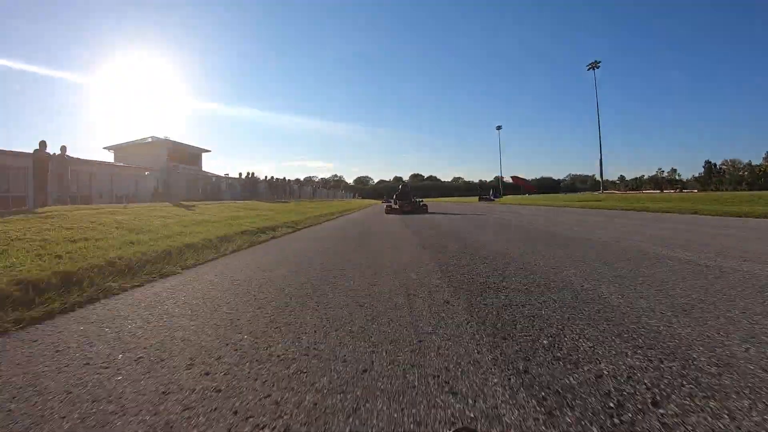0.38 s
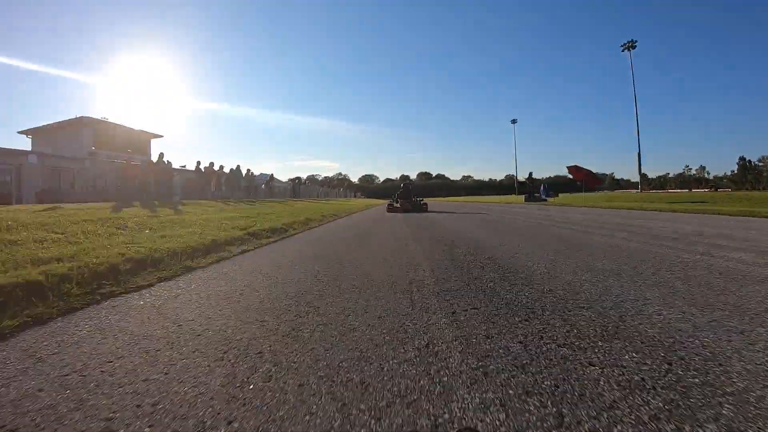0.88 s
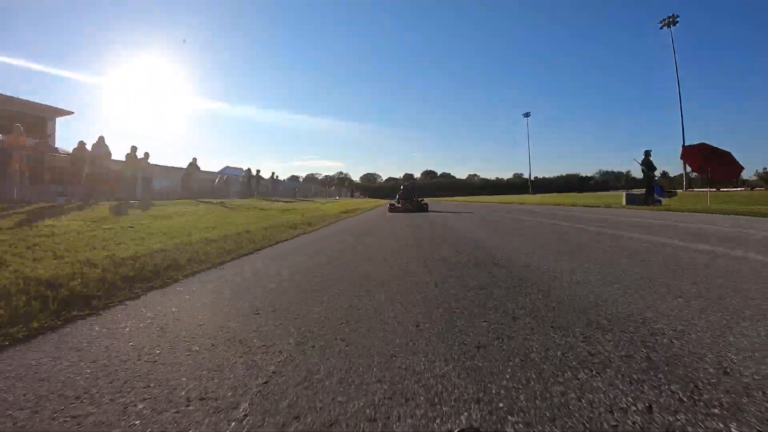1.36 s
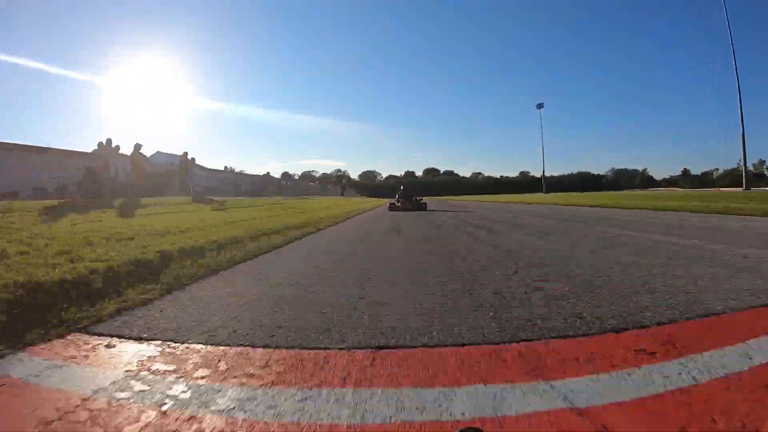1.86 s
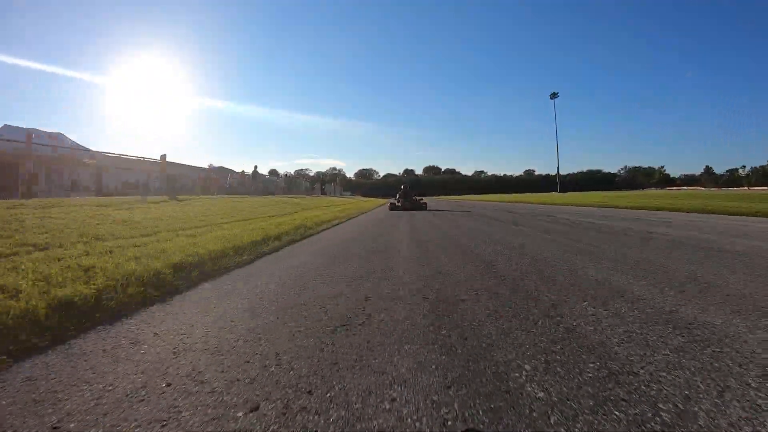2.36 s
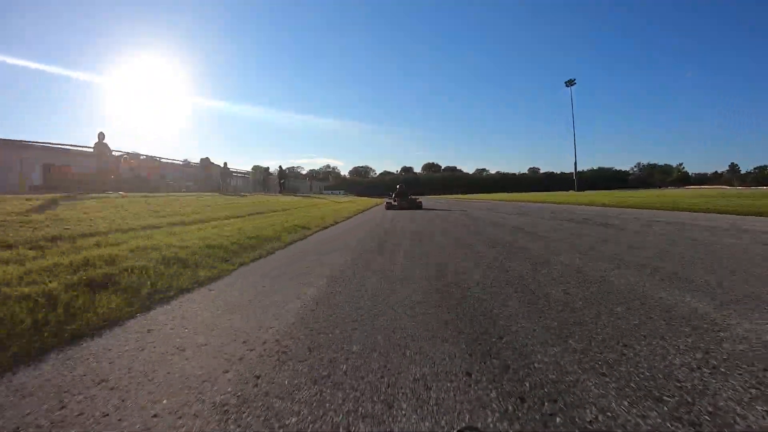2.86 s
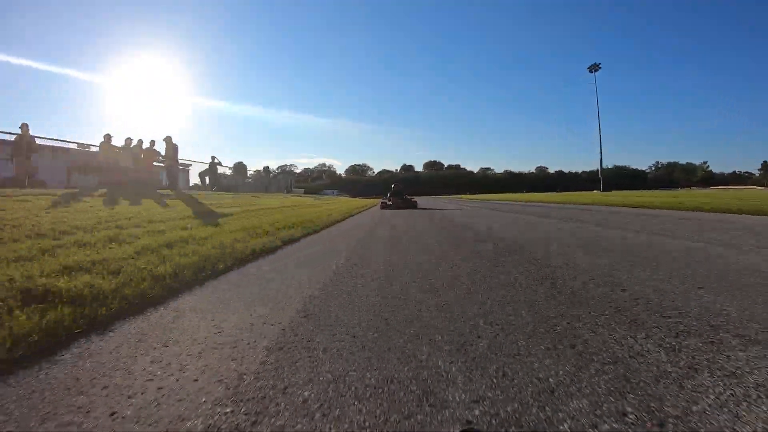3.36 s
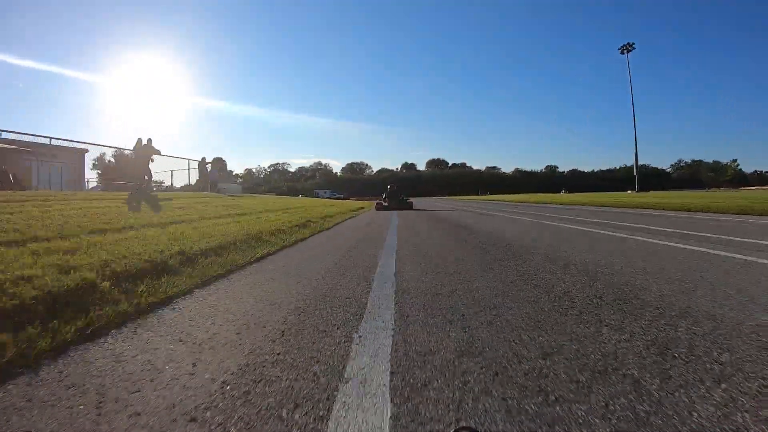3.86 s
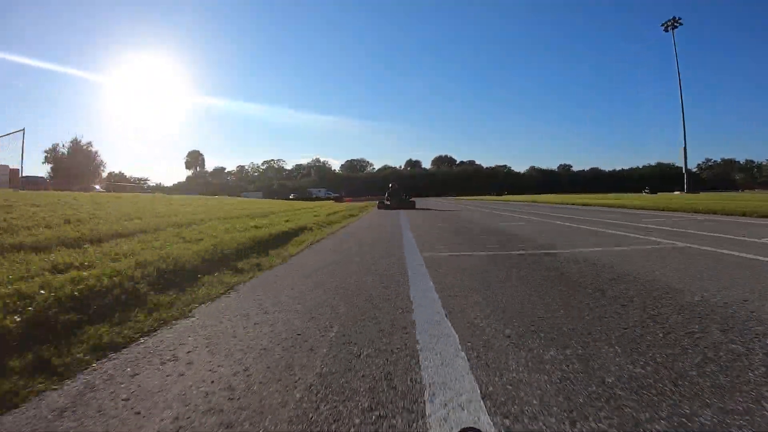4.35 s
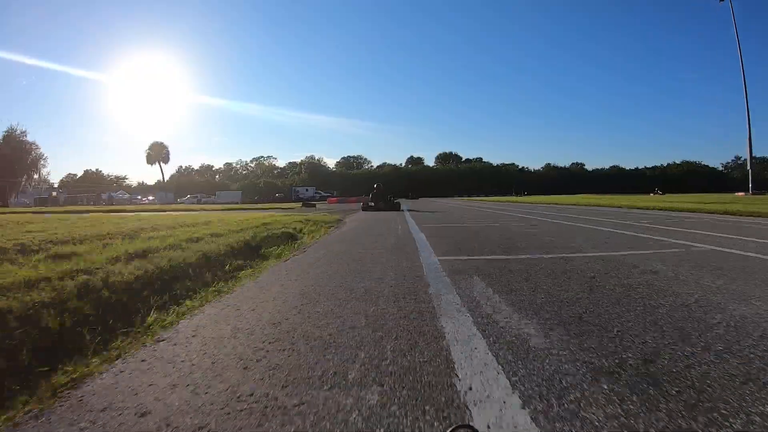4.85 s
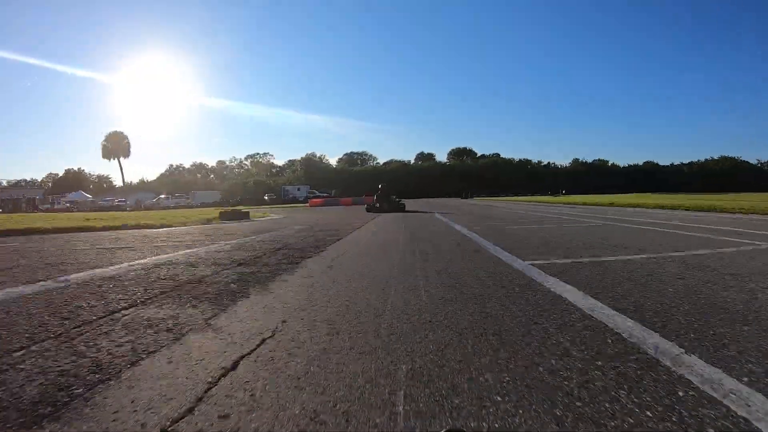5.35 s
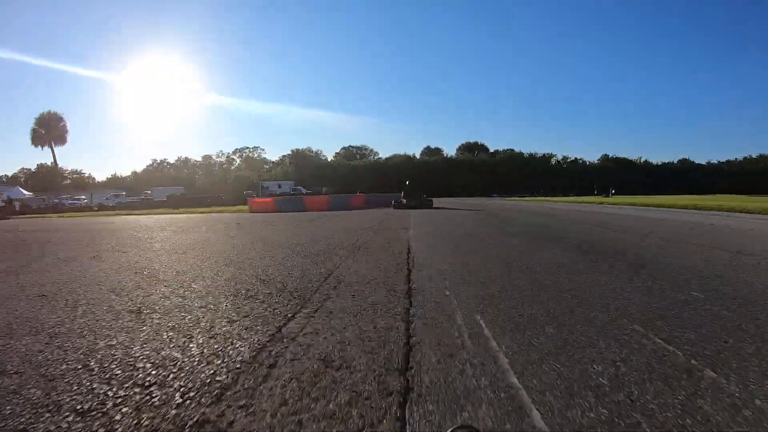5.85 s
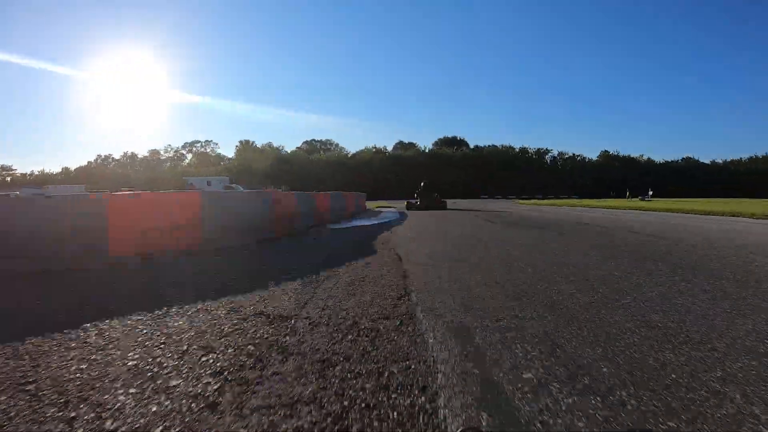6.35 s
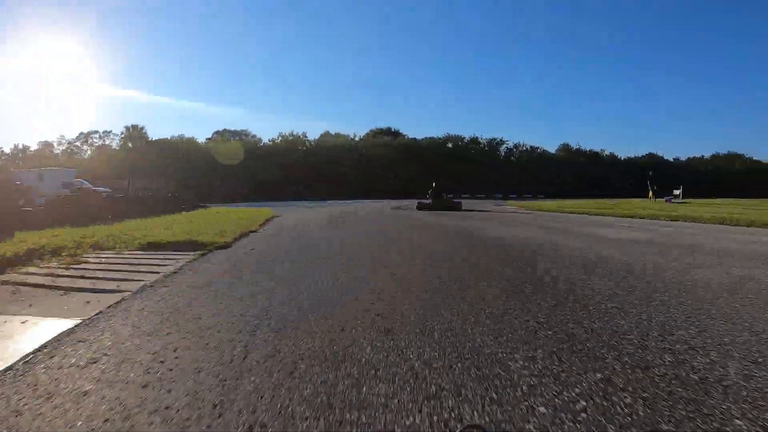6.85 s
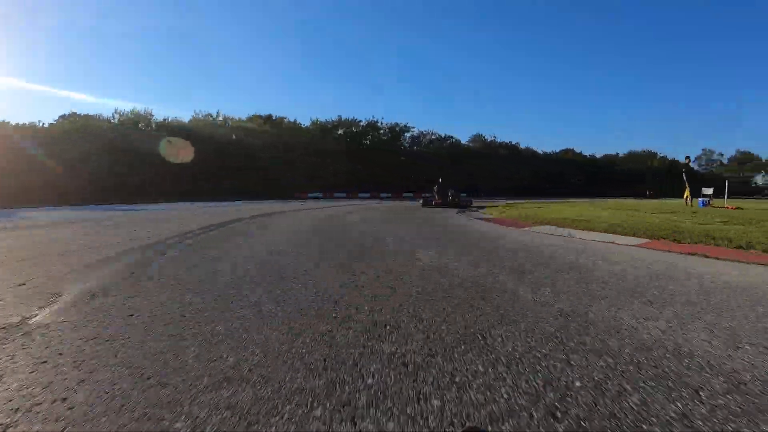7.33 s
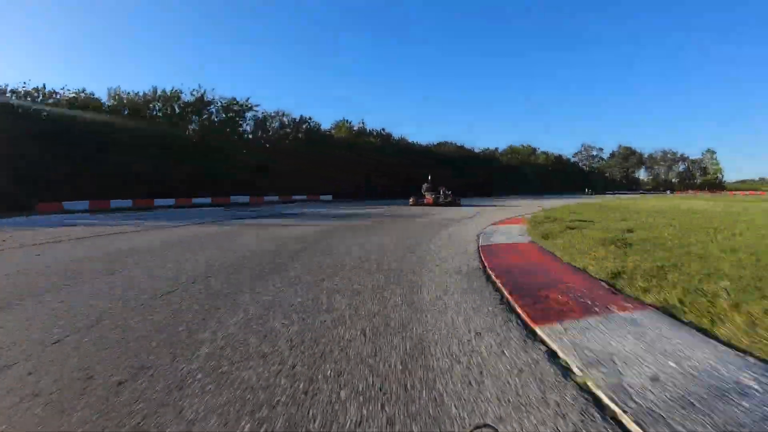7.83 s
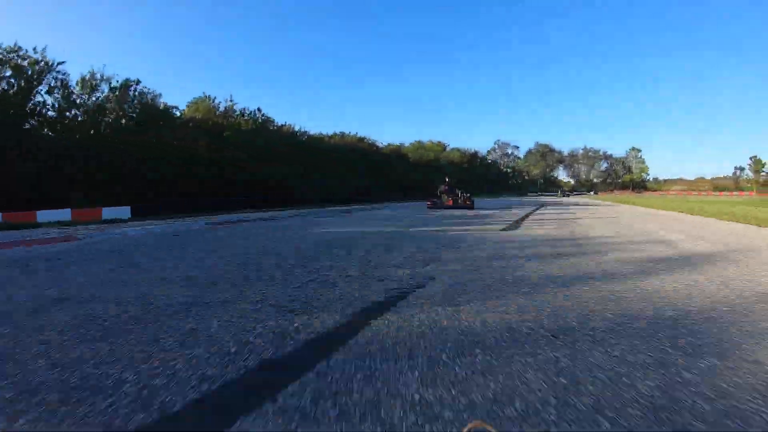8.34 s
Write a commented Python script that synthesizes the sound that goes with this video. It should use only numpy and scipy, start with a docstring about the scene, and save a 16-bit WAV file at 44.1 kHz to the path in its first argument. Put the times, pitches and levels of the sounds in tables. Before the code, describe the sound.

A small single-cylinder kart engine drones and climbs along a straight, stutters against its rev limiter, then sags in a bend over wind rumble and frame rattle.

```python
"""A single-cylinder four-stroke kart engine, heard from the kart's nose: multiples of the firing rate through pipe
resonances. It climbs a straight until the rev limiter skips sparks, then sags in a bend, where a band of noise is
the scrubbing tyres. Shaped low noise is wind and road rumble; noise pulsed at each firing is the clattering frame,
with a pinging bracket and knocks over seams in the track. A quick gain control evens out the level."""
import sys
import numpy as np
from scipy import signal
from scipy.fft import rfft, irfft
from scipy.io import wavfile
from scipy.ndimage import uniform_filter1d, minimum_filter1d

SR = 44100
rng = np.random.default_rng(int(sys.argv[2]) if len(sys.argv) > 2 else 0)


def unload_audio(sound):
    """Save the sound as a 16-bit wav file, at the path given as the first command line argument."""
    columns = np.transpose(np.atleast_2d(sound))
    # keep every value between -1 and 1, then stretch to whole-number steps
    steps = np.round(np.clip(columns, -1, 1) * 32767)
    wavfile.write(sys.argv[1], SR, steps.astype(np.int16))


def gain_from_db(level_db):
    """Turn a decibel level (scalar or array-like) into a linear amplitude factor."""
    decades = np.asarray(level_db, float) / 20
    return 10 ** decades


N = 373086
LIMIT_HZ = 50.14  # firings a second at which the limiter caps the engine
BEND_S = 7.3  # the bend begins


def evened(x):
    """Scales to rms 1."""
    return x / np.sqrt(np.mean(x ** 2) + 1e-20)


def curve(rows, column=1):
    """One column of a table in time, at every sample."""
    rows = np.array(rows)
    return np.interp(np.arange(N) / SR, rows[:, 0], rows[:, column])


def response(hz, modes):
    """A flat path plus resonances, each given as centre and width in Hz and a level in dB."""
    return 1 + sum((gain_from_db(db) - 1) / (1 + 2j * (hz - f) / width) for f, width, db in modes)


def coloured(x, points, modes=()):
    """Filters x by a spectrum and by resonances that stand on it; rms 1."""
    hz = np.fft.rfftfreq(len(x), 1 / SR)
    f, db = np.transpose(points)
    spectrum = gain_from_db(np.interp(np.log(hz + 1), np.log(f + 1), db))
    return evened(irfft(rfft(x) * spectrum * response(hz, modes), len(x)))


def wander(rate_hz):
    """Slow chance up to about rate_hz, rms 1."""
    hz = np.fft.rfftfreq(N, 1 / SR)
    return evened(irfft(rfft(rng.standard_normal(N)) / (1 + (hz / rate_hz) ** 4), N))


def speed():
    """Firings a second, slowed by drag, the limiter and the bend; and how far the limiter is at work (0-1)."""
    start_hz, free_top_hz, climb_s = 41.5, 61.0, 6.0
    sag_hz_per_s2, hunt_hz = 1.7, .05
    limiter_reach_hz = .12  # the limiter's work fades out over this much below the limit
    t = np.arange(N) / SR
    climb = free_top_hz - (free_top_hz - start_hz) * np.exp(-t / climb_s)
    hz = np.minimum(climb, LIMIT_HZ) - sag_hz_per_s2 * np.maximum(t - BEND_S, 0) ** 2
    limiter = np.clip(1 - (LIMIT_HZ - hz) / limiter_reach_hz, 0, 1)
    return hz + hunt_hz * limiter * wander(0.88), limiter


def firings(rate, limiter):
    """Counts the cycles; gives each one its strength and lateness, by chance and by the skipped sparks."""
    # A skipped spark and its aftermath with the limiter fully at work.
    # Each row: firings after the skip, strength in dB, lateness in ms.
    aftermath = [(0, -12, 0), (1, 3, .3), (2, 2.4, -.3)]
    turns = np.cumsum(rate) / SR
    cycle = turns.astype(int)
    chance = rng.standard_normal((cycle[-1] + 1, 3))
    # mostly every third spark is skipped, now and then the second or fourth
    gaps = np.clip(np.round(2.9 + .55 * chance[:, 0]), 2, 4).astype(int)
    skips = np.cumsum(gaps)
    each = np.arange(len(chance))
    last_skip = np.append(0, skips)[np.searchsorted(skips, each, "right")]
    since = np.minimum(each - last_skip, 2)
    _, skip_db, late_ms = np.array(aftermath)[since[cycle]].T
    strength_db = limiter * skip_db + (1.5 + .7 * limiter) * chance[cycle, 1]
    late_s = (limiter * late_ms + (.04 + .04 * limiter) * chance[cycle, 2]) / 1000
    return turns, strength_db, late_s


def smear(k):
    """Phase in radians that spreads the low multiples in time and bunches the high ones into a crack."""
    if k < np.pi:
        return .5 * k ** 2
    return np.pi * (k - np.pi / 2) + .12 * (k - 15) ** 2


def exhaust(rate, limiter, turns, strength_db, late_s):
    """One puff per cycle, summed from multiples of the firing rate and sent through the pipe's resonances."""
    # The shape of one exhaust stroke. Each row: multiple of the firing rate, level in dB.
    stroke = [(2, -27), (3, -35), (4, -34), (5, -26.8), (6, -26), (7, -40), (8, -32), (9, -35), (10, -41),
              (11, -40), (12, -45), (13, -48), (14, -46.5), (16, -51), (18, -50), (19, -45), (20, -47),
              (21, -47), (22, -47.5), (23, -45.5), (24, -47), (25, -49), (26, -50), (27, -50), (28, -52),
              (30, -52)]
    # Resonances of the exhaust pipe over a flat response. Each row: centre in Hz, width in Hz, level in dB.
    pipe = [(235, 24, -9), (262, 50, 10.5), (335, 60, 8.5), (908, 50, 11)]
    waver_db, crack_waver_db = 1, 3
    flutter_db, flutter_rad, flutter_hz = 1.5, .28, 24  # strongest under the limiter
    lift_db_per_s = 4  # the crack fades as the throttle eases in the bend

    def soft(v):
        return uniform_filter1d(v, size=150)

    lift = gain_from_db(-lift_db_per_s * np.maximum(np.arange(N) / SR - BEND_S, 0))
    angle = 2 * np.pi * (turns - .5 - soft(late_s) * rate)
    puffs = np.zeros(N)
    for k, db in stroke:
        if k > 12:
            level = lift * gain_from_db(crack_waver_db * wander(3))
        else:
            level = gain_from_db(waver_db * wander(4.5) + flutter_db * limiter * wander(flutter_hz))
        slip = flutter_rad * (.2 + limiter) * wander(flutter_hz)
        puffs += gain_from_db(db) * level * np.sqrt(2) * np.cos(k * angle + smear(k - 5.5) + slip)
    puffs *= gain_from_db(soft(strength_db) + 0.66 * wander(18.0))
    hz = np.fft.rfftfreq(2 * N, 1 / SR)
    return irfft(rfft(puffs, 2 * N) * response(hz, pipe))[:N]


def rumble():
    """Wind and tyres on the road: low noise in uneven lumps."""
    # The rumble's course. Each row: time in seconds, level in dB.
    course = [(0, -13), (1, -14.5), (2.1, -13.5), (2.6, -13), (4, -13.5), (5.6, -13), (8.46, -14)]
    # Its spectrum. Each row: frequency in Hz, relative level in dB.
    colour = [(10, -50.5), (28, -2.5), (60, 1.5), (130, -.5), (220, -2.5), (350, -6), (480, -11.5),
              (700, -26.5), (1200, -63), (4000, -110)]
    level_db = curve(course) + 1.07 * wander(30.0) + 2.04 * wander(1.9)
    return gain_from_db(level_db) * coloured(rng.standard_normal(N), colour)


def shaken(turns, strength_db, jump, decay, uneven_db, road_db):
    """Noise that jumps at each firing and decays (in cycles), jolted by the road."""
    # The frame's spectrum. Each row: frequency in Hz, relative level in dB.
    colour = [(320, -36), (550, -6), (800, -6.5), (1140, -8.5), (1510, -9.5), (1830, -13.5), (3000, -16),
              (4200, -19.5), (5490, -22), (8050, -24.5), (8600, -31), (10500, -34), (11600, -47),
              (14200, -65.5), (15200, -84)]
    # What the mount at the nose rings with. Each row: centre in Hz, width in Hz, dB over the colour.
    mount = [(1027, 100, 1.5), (1290, 110, -1.5), (2450, 120, 2)]
    jolt = np.clip(rng.standard_normal(int(turns[-1]) + 2), -2, 1.7)[turns.astype(int)]
    beat = 1 + jump * gain_from_db(strength_db + uneven_db * jolt) * np.exp(-(turns % 1) / decay)
    return coloured(rng.standard_normal(N) * beat * gain_from_db(road_db), colour, mount)


def band(x, lo_hz, hi_hz):
    """Keeps lo_hz to hi_hz; rms 1."""
    return evened(signal.sosfilt(signal.butter(2, (lo_hz, hi_hz), "band", fs=SR, output="sos"), x))


def clatter(turns, strength_db):
    """Panels, chain and loose parts shake with the engine; they share the road's jolts, each adds its own."""
    # The frame's course. Each row: time in seconds, rasp of the chain in dB, hiss of loose parts in dB.
    course = [(0, -33.5, -44.5), (.9, -32.5, -42), (1.9, -32, -39), (2.58, -30, -41.5), (2.9, -33.5, -44.5),
              (3.5, -33.5, -43), (4, -31.5, -42.5), (5, -31.5, -42), (5.4, -35.5, -43.5), (6.1, -34.5, -42),
              (6.8, -32.5, -38.5), (7.25, -35.5, -40.5), (8, -35, -42.5), (8.46, -31, -38.5)]
    boom_db = -29  # the panels boom at one level
    road = wander(27)
    boom_road_db = 0.58 * road + 0.91 * wander(29) + 0.6 * wander(16)
    boom = shaken(turns, 0.77 * strength_db, jump=0.5, decay=0.46, uneven_db=5.0, road_db=boom_road_db)
    rasp_road_db = 0.64 * road + 0.14 * wander(31)
    rasp = shaken(turns, 0.23 * strength_db, jump=0.44, decay=0.41, uneven_db=4.5, road_db=rasp_road_db)
    hiss_road_db = 0.66 * road + 1.4 * wander(40)
    hiss = shaken(turns, .3 * strength_db, jump=0.13, decay=0.9, uneven_db=10.0, road_db=hiss_road_db)
    panels = gain_from_db(boom_db) * band(boom, 400, 1600)
    chain = gain_from_db(curve(course, column=1)) * band(rasp, 1600, 4800)
    loose_parts = gain_from_db(curve(course, column=2)) * band(hiss, 4800, 20000)
    return panels + chain + loose_parts


def bracket(rate, turns, strength_db):
    """A loose bracket: a tick and a short scratch per firing ring its modes, loudest near the limit."""
    # The bracket's modes. Each row: centre in Hz, width in Hz, level in dB.
    modes = [(3480, 260, -3), (3830, 300, 0), (4450, 200, -2.5)]
    # Its hardest pings. Each row: time in seconds, strength of the blow in dB.
    hard_pings = [(3.4218, -30), (3.5799, -25), (3.8014, -29), (4.0813, -24), (4.3796, -27), (4.6788, -28),
                  (4.8385, -28), (4.8775, -29), (4.9593, -26), (5.0411, -20), (5.6562, -24), (5.975, -28),
                  (6.0154, -24), (6.1351, -33), (6.2548, -24), (6.3746, -27), (6.8126, -26), (6.9118, -26),
                  (7.1309, -25.5), (7.1907, -28), (7.2306, -25), (7.29, -30), (7.3499, -20)]
    ping_db, ping_db_per_hz = -30.5, 3.5  # level at the limit, loss per Hz under it
    lead = .08  # cycles ahead of the firing
    fade_s, tick = .005, 4  # the scratch's time constant, the tick's weight
    share_db = 2.5  # how unevenly a blow reaches the modes
    cycle = (turns + lead).astype(int)
    # a skipped spark softens its blow
    blow_db = .3 * np.roll(strength_db, -200) + 1.5 * rng.standard_normal(cycle[-1] + 1)[cycle]
    under_limit_hz = np.maximum(LIMIT_HZ - rate, 0)
    blows = np.diff(cycle, prepend=0) * gain_from_db(blow_db + ping_db - ping_db_per_hz * under_limit_hz)
    s, db = np.transpose(hard_pings)
    blows[np.round(s * SR).astype(int)] += gain_from_db(db)
    # of blows close together only the strongest stays
    strongest = -minimum_filter1d(-blows, size=600)
    blows *= strongest <= blows
    scratch = signal.lfilter([1], [1, -np.exp(-1 / (fade_s * SR))], blows)
    noise = rng.standard_normal(N)
    hz = np.fft.rfftfreq(N, 1 / SR)
    rings = [gain_from_db(db) / (1 + 2j * (hz - f) / width) ** 2 for f, width, db in modes]
    drive = noise * scratch / 2 + tick * blows * np.sign(noise)
    shares = gain_from_db(share_db * rng.standard_normal((cycle[-1] + 1, len(rings))))[cycle].T
    pings = sum(irfft(rfft(drive * share) * ring, N) for share, ring in zip(shares, rings))
    return pings / np.std(irfft(rfft(noise) * sum(rings), N))


def knocks():
    """Seams in the track: a tick and a puff of noise, each through its own wide resonance and a shared low thud."""
    # Knocks over the seams. Each row: start in seconds, level in dB, centre in Hz, 60 dB decay in seconds.
    seams = [(0.049, -17, 900, .08), (0.242, -20, 950, 0.048), (0.708, -21, 950, 0.054),
             (1.36, -11.5, 800, .12), (2.242, -11, 696, 0.058), (2.357, -15.5, 800, 0.13),
             (2.577, -16, 700, 0.054), (2.847, -10, 650, 0.069), (3.054, -18, 900, 0.036),
             (3.19, -17, 680, 0.084), (3.342, -17, 850, .07), (3.577, -12, 1060, 0.027),
             (3.896, -18, 800, 0.027), (4.049, -12, 734, .045), (4.421, -13, 880, .1),
             (4.488, -22, 800, .03), (4.502, -12.5, 630, 0.15), (5.143, -10.5, 1290, 0.017),
             (5.802, -17, 800, .03), (6.504, -17, 794, 0.16), (6.6, -16, 885, 0.1),
             (6.617, -17, 850, 0.033), (6.703, -18, 800, 0.0268), (7.009, -19, 800, 0.042),
             (7.47, -15.5, 744, 0.26), (8.055, -14.5, 795, 0.3), (8.156, -11, 800, .025)]
    rise_share, q = .12, 1.2  # rise as a share of the decay: long jolts swell, short ones snap
    contact, snap_s = 18, .03  # the first contact over the noise, weaker for decays longer than snap_s
    thud_hz, thud_width_hz, thud_db = 560, 320, -1  # every knock also sounds the floor tray
    out = np.zeros(N)
    t = np.arange(SR // 2) / SR
    hz = np.fft.rfftfreq(len(t), 1 / SR)
    thud = gain_from_db(thud_db) / (1 + 2j * (hz - thud_hz) / thud_width_hz) ** 2
    noises = rng.standard_normal((len(seams), len(t)))
    for (s, db, centre_hz, t60), noise in zip(seams, noises):
        decay_s = max(t60, .01)
        rise_s = rise_share * decay_s
        tick = contact * min(snap_s / decay_s, 1) ** 2
        puff = gain_from_db(-60 * t / decay_s) * np.minimum(t / rise_s, 1)
        detune = (hz + 1) / centre_hz - centre_hz / (hz + 1)
        ring = 1 / (1 + 1j * q * detune) ** 2 / (1 + (hz / 4000) ** 4)
        struck = noise + tick * (np.arange(len(t)) == round(rise_s * SR))
        sound = puff * irfft(rfft(struck) * (ring + thud), len(t))
        sound *= gain_from_db(db) * np.linalg.norm(puff) / np.linalg.norm(sound)
        part = out[round(s * SR):][:len(t)]
        part += sound[:len(part)]
    return out


def scrub():
    """Tyres scrubbing through the bend: noise in one wide resonance, coming in uneven lumps."""
    # The scrub's course. Each row: time in seconds, level in dB.
    course = [(7.2, -59), (7.4, -39), (8.25, -35), (8.46, -42)]
    centre_hz, width_hz = 1250, 180
    hz = np.fft.rfftfreq(N, 1 / SR)
    ring = 1 / (1 + 2j * (hz - centre_hz) / width_hz) ** 2
    heard = np.arange(N) / SR > course[0][0]
    level = heard * gain_from_db(curve(course) + 1.7 * wander(12))
    return level * evened(irfft(rfft(rng.standard_normal(N)) * ring, N))


def scene():
    """Engine, wind, frame and tyres at one microphone."""
    rate, limiter = speed()
    turns, strength_db, late_s = firings(rate, limiter)
    frame = clatter(turns, strength_db) + bracket(rate, turns, strength_db) + knocks()
    engine = exhaust(rate, limiter, turns, strength_db, late_s)
    return (engine + rumble() + frame + scrub())[None]


def band_limit(x):
    """A steep low-pass at the top of the band."""
    return signal.sosfilt(signal.butter(12, 15000, fs=SR, output="sos"), x)


def record(dry):
    """Quick gain control, a soft ceiling, then a boost of the top treble around 14 kHz."""
    # A boost of the top treble around 14 kHz. Each row: frequency in Hz, level in dB.
    treble_boost = [(20, 0), (11900, 0), (13200, 8), (14200, 11), (14600, 13), (15200, 0)]
    power_db = 10 * np.log10(abs(uniform_filter1d(dry[0] ** 2, size=500)) + 1e-9)
    excess_db = uniform_filter1d(np.maximum(power_db + 12, 0), size=60)  # over -12 dB
    held = dry[0] / gain_from_db(.45 * excess_db)
    ceiling = 1.3
    soft = ceiling * np.tanh(held / ceiling)
    padded = np.pad(soft, 500, "reflect", reflect_type="odd")  # keeps the filter's ends smooth
    mix = coloured(padded, treble_boost)[500:-500] * np.std(soft)
    return band_limit(mix[None])


dry = scene()
out = record(dry)
unload_audio(out)
```